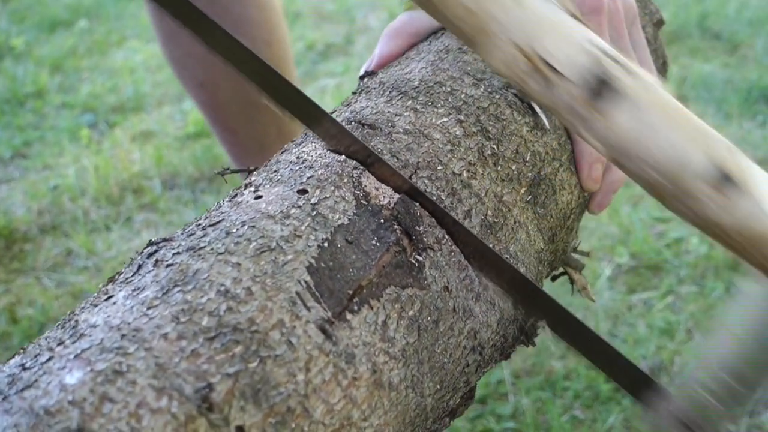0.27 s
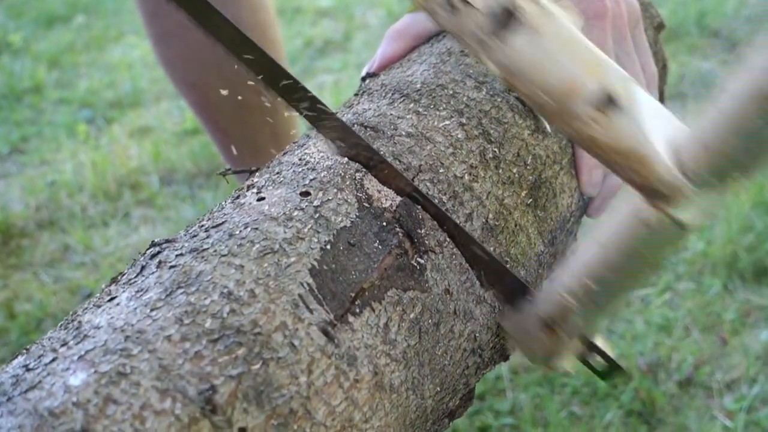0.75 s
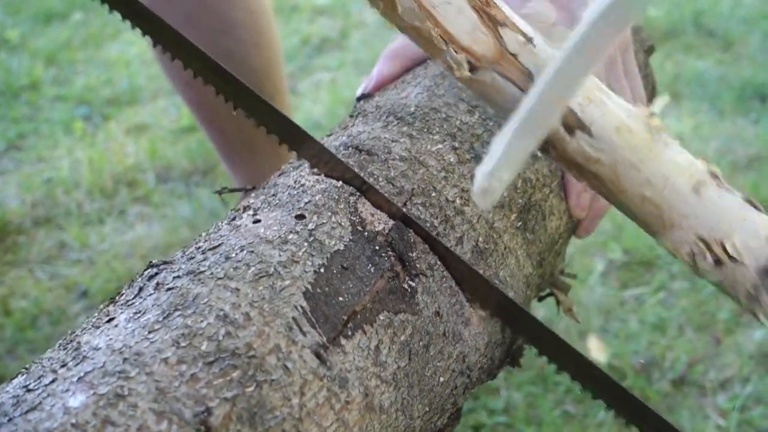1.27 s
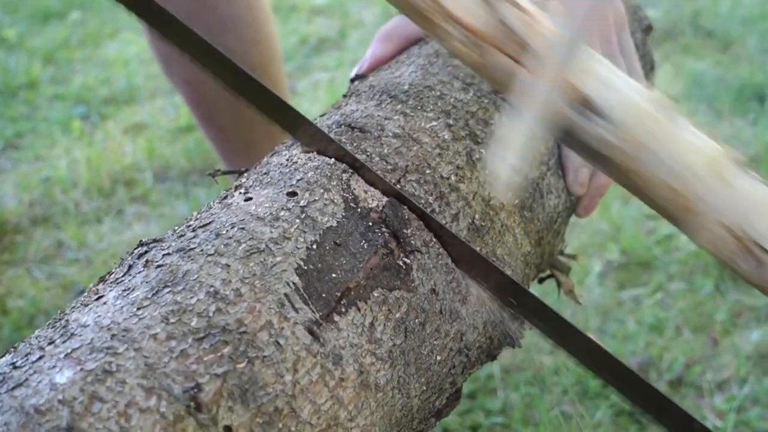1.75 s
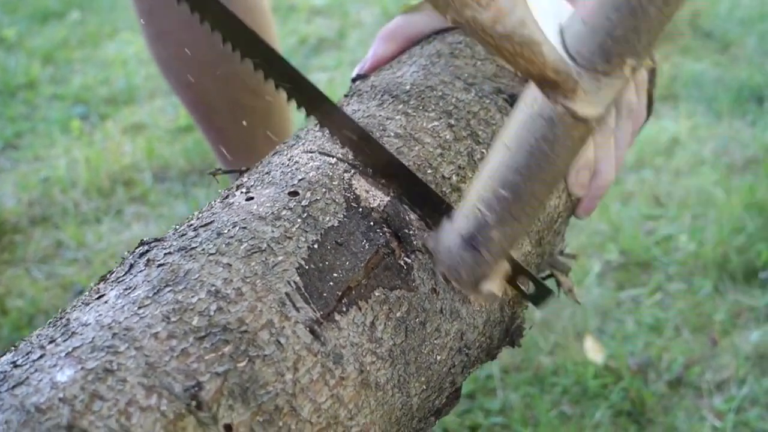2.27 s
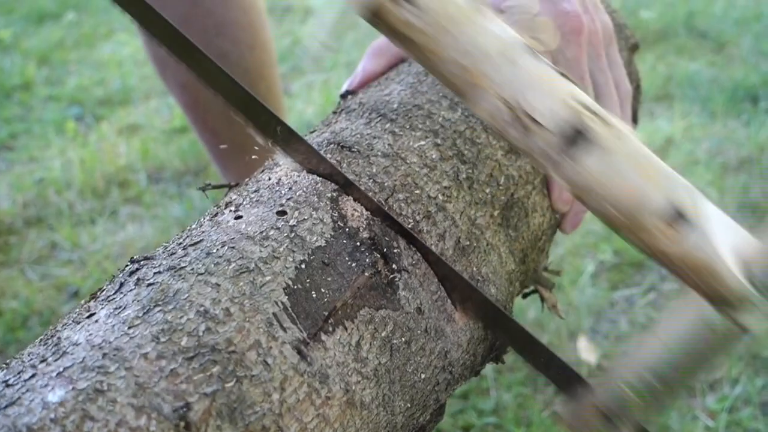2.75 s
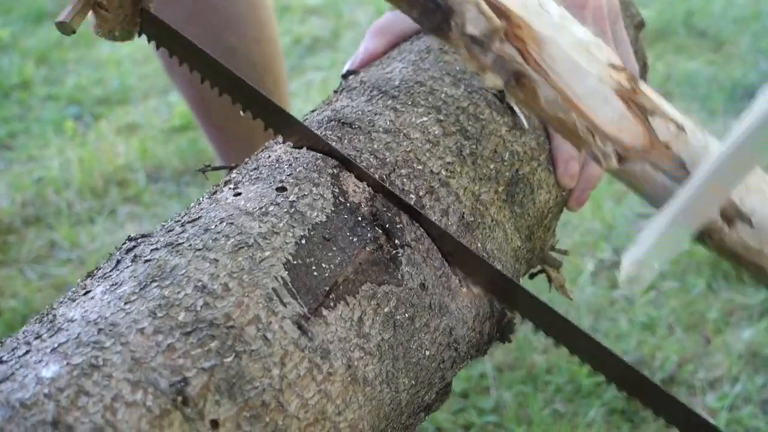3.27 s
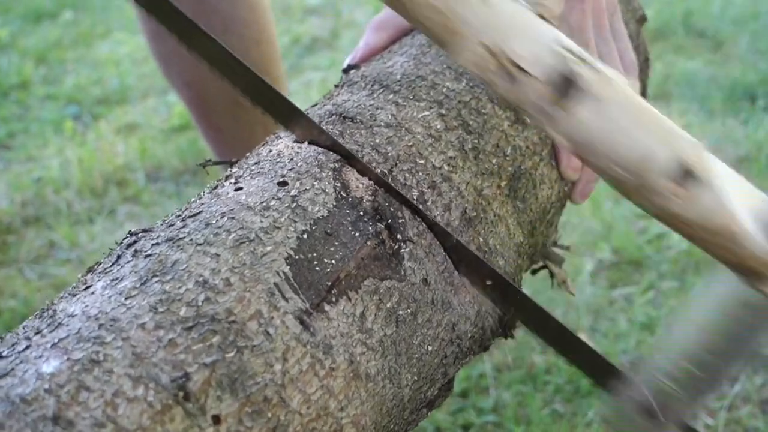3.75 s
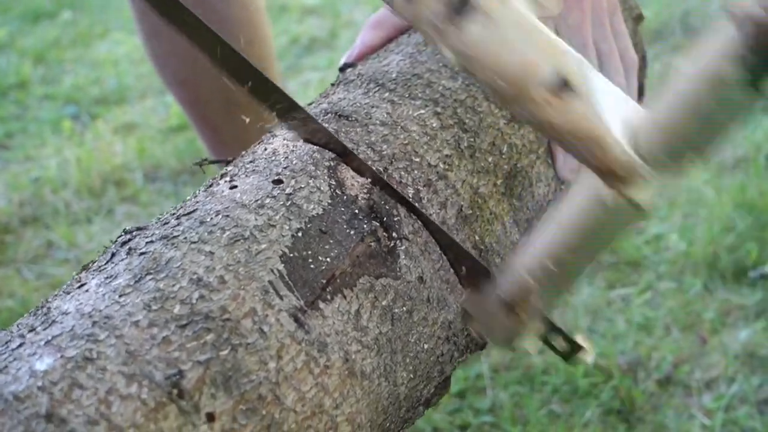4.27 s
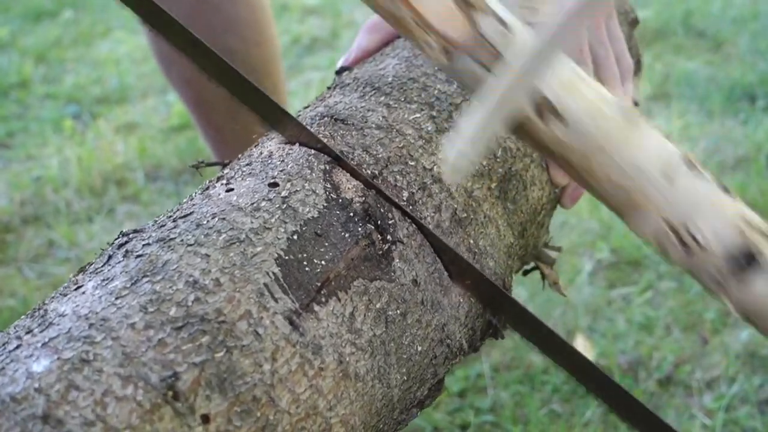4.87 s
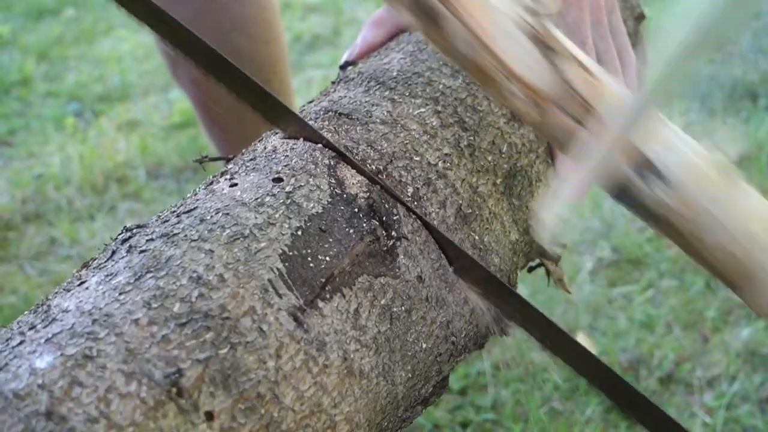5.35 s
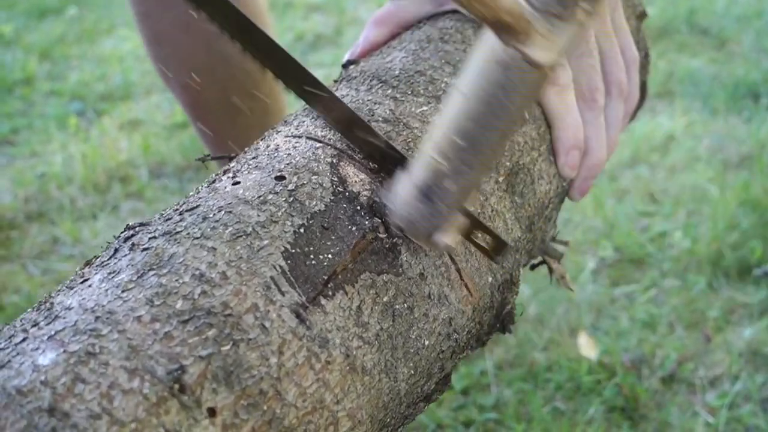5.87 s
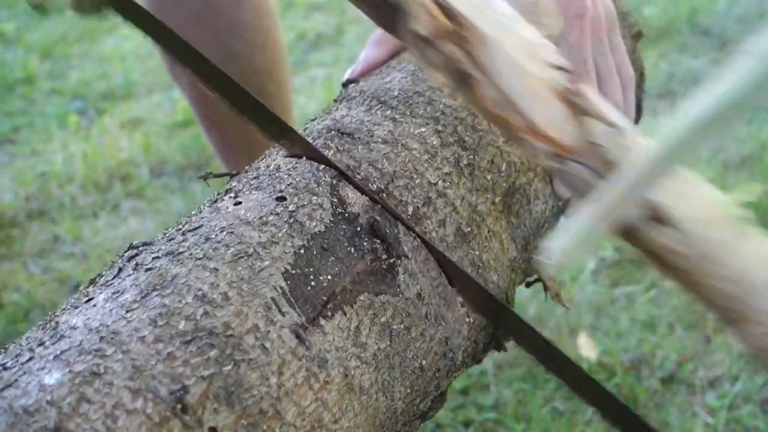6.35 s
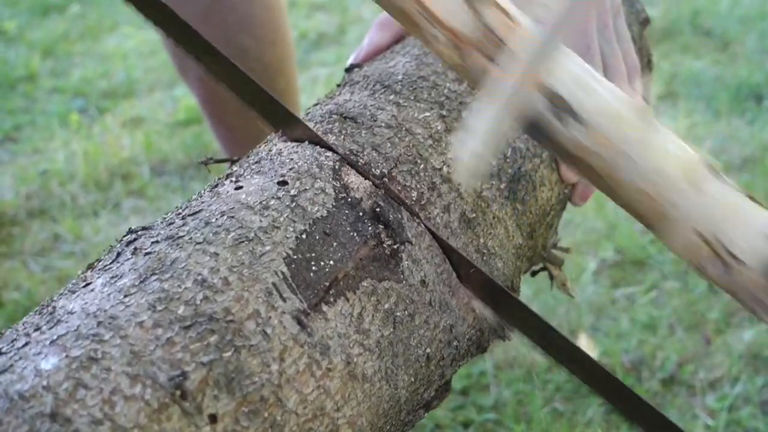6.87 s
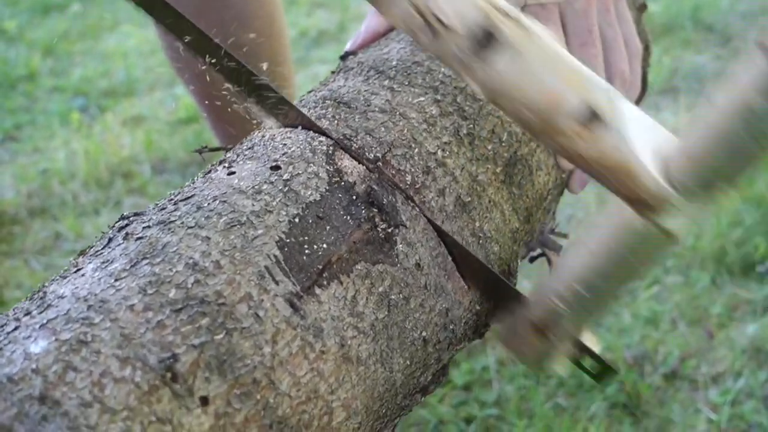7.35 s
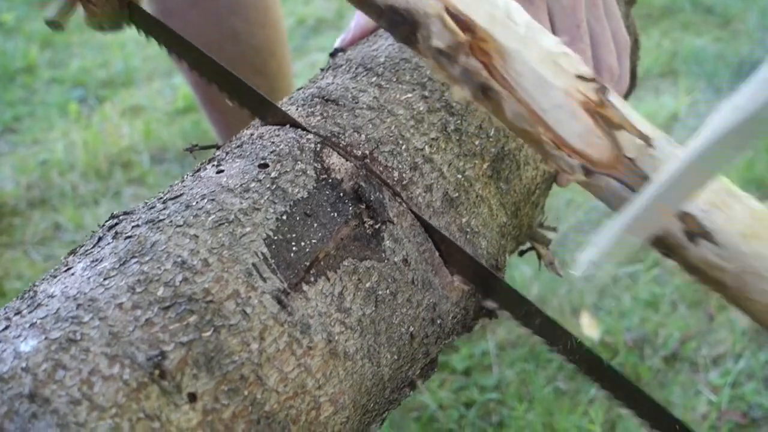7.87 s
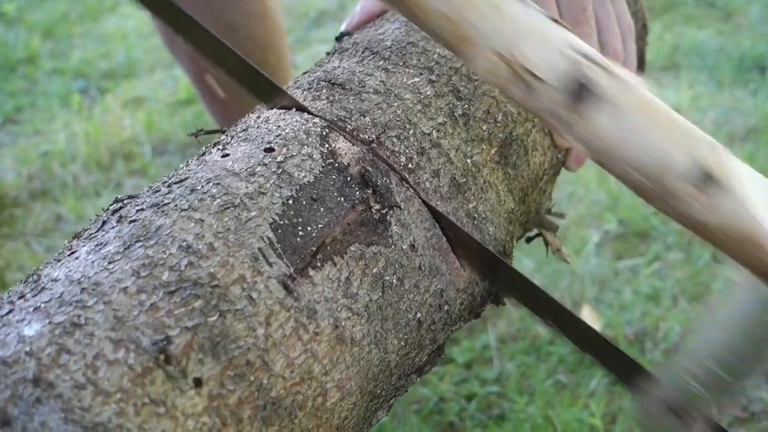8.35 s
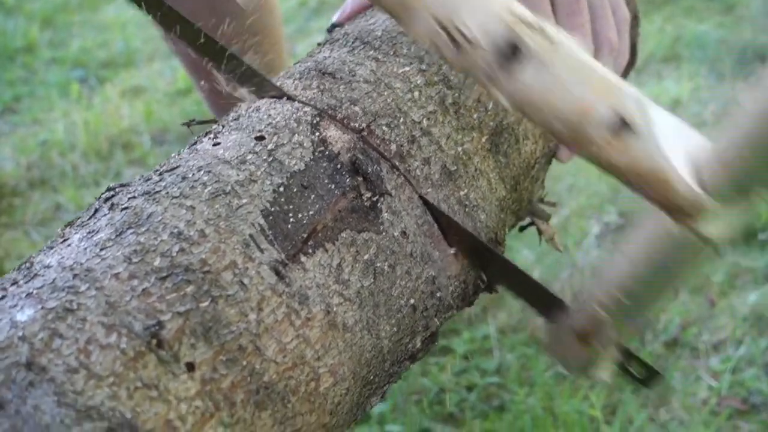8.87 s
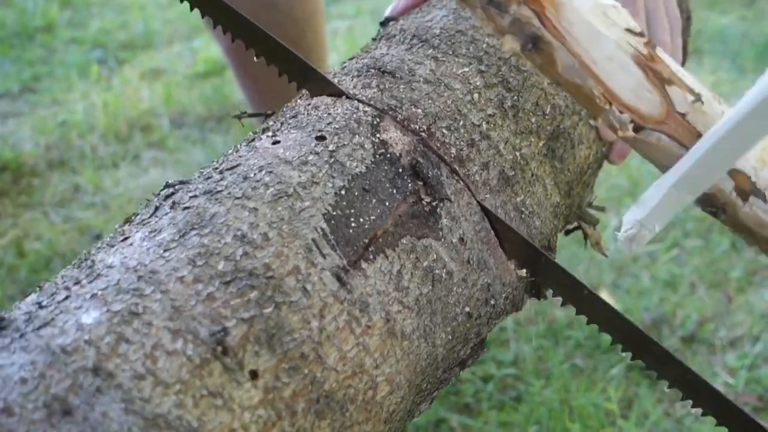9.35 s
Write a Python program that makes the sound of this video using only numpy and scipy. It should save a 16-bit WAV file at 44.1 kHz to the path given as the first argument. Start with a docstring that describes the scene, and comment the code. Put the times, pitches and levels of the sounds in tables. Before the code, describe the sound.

A hand saw rasps steadily back and forth through a log, its blade ticking, while wind gusts rumble on the microphone.

```python
"""A hand saw rasps back and forth through a thick log, close by, out on a lawn.
Its teeth tear the wood fibres in a stream of tiny snaps that ring the log, the blade and the saw's
wooden frame. The blade ticks in the cut, often as the stroke turns, and now and then it snags.
Gusts of wind rumble on the microphone, over a faint outdoor hiss."""
import sys
import numpy as np
from scipy import signal
from scipy.fft import rfft, irfft, next_fast_len
from scipy.io import wavfile
from scipy.ndimage import uniform_filter1d, map_coordinates

SR = 44100
rng = np.random.default_rng(int(sys.argv[2]) if len(sys.argv) > 2 else 0)


def write(x):
    x = np.atleast_2d(x).T
    wavfile.write(sys.argv[1], SR, np.round(np.clip(x, -1, 1) * 32767).astype(np.int16))


N = 423845

# The brief ringing tones of the blade in the cut. Each row: pitch in Hz, width in Hz, level in dB.
BLADE_TONES = [(1550, 350, -9), (2060, 260, -5), (2820, 330, -1), (3800, 450, 1), (6500, 450, -3)]


def saw():
    """The moving teeth bite unevenly; the same bite makes the rasp and shakes the frame."""
    gain, ring_db = strokes()
    speed = np.sqrt(10 * gain)  # a louder stroke stands for a faster blade
    chatter = amp(wobble(90))  # groups of teeth grip more or less
    tearing = fibres(speed, tears_per_s=1100, spread_db=2.8, fade_s=.0005)
    bite = gain * unit(chatter * (1.1 + .5 * tearing))
    return rasp(bite, speed) + frame_ring(bite, ring_db) + catching_teeth(gain)


def strokes():
    """The arm pulls and pushes in turn. Gives the rasp's gain and the frame's ring in dB over time."""
    # Each row: start and end in seconds, level halfway in dB, change from start to end in dB,
    # relative strength of the frame's ring in dB.
    arm_strokes = [(-0.12, 0.19, -26.5, 11.5, -8.5), (0.182, 0.503, -22.5, -7.5, -3),
                   (0.531, 0.884, -25.5, 19, -8.5), (0.869, 1.147, -22.5, 0, -5),
                   (1.306, 1.617, -27, 11.5, -8), (1.604, 1.929, -22.5, -11.5, -4),
                   (1.989, 2.313, -24, 14.5, -7), (2.293, 2.579, -24.5, -14, -5.5),
                   (2.629, 2.94, -27, 23.5, -6), (2.924, 3.258, -22.5, -12.5, -4),
                   (3.299, 3.673, -27.5, 8.5, -5), (3.688, 3.998, -22.5, -15.5, -4.5),
                   (4.044, 4.44, -27.5, 14.5, -8), (4.41, 4.755, -22, -9, -5.5),
                   (4.776, 5.177, -26.5, 11, -5), (5.16, 5.495, -22.5, -7, -5.5),
                   (5.543, 5.89, -22.5, 13.5, -7.5), (5.856, 6.3, -24, 2, -4.5),
                   (6.328, 6.7, -24, 14, -3.0), (6.678, 7.063, -24, -6.5, -4),
                   (7.104, 7.489, -26, 19, -3.5), (7.467, 7.814, -23.5, 1.5, -3),
                   (7.87, 8.249, -25.5, 24.5, -5.5), (8.214, 8.578, -24.5, 3, -3.5),
                   (8.629, 9.03, -27.5, 11.2, -1), (9.122, 9.414, -24.5, -19, -2.0),
                   (9.497, 9.85, -36.5, -18, 1.5)]
    # The blade snags or lurches free. Each row: time in seconds, length in seconds, level change in dB.
    snags = [(4.151, .04, -2.5), (4.98, 0.02, -8.5), (5.213, 0.015, -2.5), (5.634, 0.023, -5),
             (5.89, 0.015, -9), (5.921, 0.026, 4), (5.949, 0.018, -18), (6.357, 0.014, -15),
             (6.413, 0.017, 4), (8.246, 0.014, -18), (9.006, 0.018, -24)]
    pull_s, push_s = (0.07, 0.16), (0.16, 0.06)  # fade in, fade out: a pull bites fast, a push slowly
    ring_rise_db = 4  # the frame is loaded more as a stroke goes on
    t = np.arange(N) / SR
    gain, ring_db = np.zeros((2, N))
    ease = lambda share: np.sin(np.pi / 2 * np.clip(share, 0, 1)) ** 2
    for k, (start, end, db, swell_db, frame_db) in enumerate(arm_strokes):
        attack, release = push_s if k % 2 else pull_s
        first = max(round(start * SR), 0)
        now = t[first:round(end * SR)]
        past_middle = (now - start) / (end - start) - .5
        fades = ease((now - start) / attack) * ease((end - now) / release)
        gain[first:][:len(now)] += amp(db + swell_db * past_middle) * fades
        ring_db[first:][:len(now)] = frame_db + ring_rise_db * past_middle
    for when, length, change_db in snags:
        gain *= amp(change_db * np.exp(-((t - when) / length * 2) ** 4))
    return gain, ring_db


def fibres(speed, tears_per_s, spread_db, fade_s):
    """The jumpy loudness of tearing fibres. The rate is for a speed of 1; a slower blade tears fewer."""
    tears = (rng.random(N) < tears_per_s * speed / SR) * amp(spread_db * rng.exponential(size=N))
    fade = np.exp(-np.arange(SR // 100) / SR / fade_s)
    power = signal.fftconvolve(tears ** 2, fade)[:N]
    return np.sqrt(np.abs(power / uniform_filter1d(power + 1e-9, SR // 12)))


def rasp(bite, speed):
    """Teeth rip the wood: grainy noise, with splinters snapping in the treble and one bright scrape."""
    # The rasp's tone, with a thin zing above 12 kHz. Each row: frequency in Hz, level in dB.
    tone = [(760, -5.5), (1450, -6.5), (2250, 2), (3700, 2.5), (4700, -3), (10700, -7.5), (12250, -7),
            (12500, 2.5), (13100, -1.5), (15500, -3), (16300, -53)]
    # The side of the blade rubs once. In order: start in seconds, end in seconds, boost in dB.
    start, end, scrape_db = (2.335, 2.435, 11)
    split_hz = 5500
    splinters = unit(.8 + .2 * fibres(speed, tears_per_s=50, spread_db=5, fade_s=.0007))
    noise = shifting_noise(depth_db=1.8, hold_steps=8) * bite  # the blade's free length keeps changing
    shape = colour(tone)
    scale = np.sqrt(np.mean(shape(np.linspace(0, SR / 2, 2000)) ** 2))
    low = filtered(noise, lambda hz: shape(hz) / np.sqrt(1 + (hz / split_hz) ** 4))
    high = filtered(noise * splinters, lambda hz: shape(hz) / np.sqrt(1 + (split_hz / (hz + 1)) ** 4))
    rubbing = amp(scrape_db) * (np.abs(np.arange(N) / SR - (start + end) / 2) < (end - start) / 2)
    scrape = filtered(high * rubbing, lambda hz: np.exp(-((hz - 6800) / 3300) ** 2))
    return (low + high + scrape) / scale


def frame_ring(bite, ring_db):
    """The tearing and a few knocks shake the wooden frame, which rings on a little."""
    # The frame's ringing tones. Each row: pitch in Hz, width in Hz, level in dB.
    frame_tones = [(208, 8, -7), (275, 13, -3), (357, 16, 1), (417, 10, 1.5), (487, 20, -1), (669, 30, -5),
                   (746, 16, -1), (842, 26, 2), (932, 20, -2.5), (1051, 24, -4), (1148, 26, 1),
                   (1235, 60, -4.5)]
    # Each row: time in seconds, relative strength in dB, length of the blow in milliseconds.
    knocks = [(1.166, -25.5, 0.36), (1.356, -14, 1.4), (6.32, -16.5, 0.29), (6.724, -14.5, 2.2),
              (7.837, -14.5, 0.34), (8.245, -16.5, 2.35), (8.605, -14, 0.3)]
    shake = shifting_noise(depth_db=3, hold_steps=24)  # grip and position favour different tones
    shake = shake * bite * amp(ring_db + 18.5)
    for when, db, contact_ms in knocks:
        blow = np.hanning(round(contact_ms * SR / 1000))  # a shorter blow reaches higher tones
        shake[0, round(when * SR):][:len(blow)] += amp(db + 16.5) * blow
    return filtered(shake, resonances(frame_tones))


def catching_teeth(gain):
    """Single teeth catch at random during a stroke and ring the blade."""
    catches_per_s, below_rasp_db = 160, 9
    hits = (rng.random(N) < catches_per_s / SR) * amp(rng.normal(0, 2.5, N))
    jolts = signal.fftconvolve(hits, np.hanning(SR // 2000))[:N] * rng.standard_normal((2, N))
    return amp(-below_rasp_db) * gain * unit(filtered(jolts, resonances(BLADE_TONES)))


def ticks():
    """The blade ticks and fibres snap: each crack rings the blade and adds a sharp burst of treble."""
    # Each row: time in seconds, level of the ring in dB, treble compared with the ring in dB.
    cracks = [(0.9333, -8, -14), (2.0093, -31, 7), (2.3201, -23, 3), (2.3437, -9.5, -4), (2.4706, -9, -15),
              (2.6283, -24, -18), (2.6623, -13.5, -17), (3.3786, -14, -11), (3.491, -14.5, 2.5),
              (3.544, -13, -3), (3.6686, -11.5, -17), (4.0696, -36, 13), (4.1034, -35, 2), (4.122, -22, 3),
              (4.4417, -17, -1), (4.636, -23, 2), (4.959, -18, 5), (4.9824, -19.5, 8.5), (5.186, -8, -14),
              (5.237, -19, 7), (5.6134, -23, -15), (5.961, -11.5, -3), (6.0205, -7, -15), (6.042, -14, -5),
              (6.331, -13, -14), (6.3696, -20.5, 2), (6.655, -12, -18), (6.744, -8.5, -18),
              (7.1796, -12, -3), (7.525, -11.5, -5), (7.554, -8.5, -6), (7.84, -18, -17),
              (7.9468, -10.5, -18), (8.305, -10, -8), (8.6082, -17.5, -13), (8.703, -13, -14),
              (9.0195, -10.5, -16), (9.419, -24.5, -21), (9.5196, -24, 3.5)]
    out, t = np.zeros((2, N + SR)), np.arange(SR // 80) / SR
    treble = signal.butter(2, [6760, 13300], "band", fs=SR, output="sos")
    snap_shape = (1 - np.exp(-t / .0006)) * amp(-60 * t / 0.027)
    by_peak = lambda x: x / np.abs(x[0]).max()
    for when, db, treble_db in cracks:
        ring = np.zeros((2, len(t)))
        for hz, width, level in BLADE_TONES:
            fade = amp(level + rng.normal(0, 4)) * np.exp(-np.pi * width * t)
            pitch = hz * rng.normal(1, .04)  # the blade's free length shifts
            ring += fade * np.sin(2 * np.pi * pitch * t + rng.uniform(0, 2 * np.pi, (2, 1)))
        ring *= 1 - np.exp(-t / .0007)
        snap = signal.sosfilt(treble, rng.standard_normal((2, len(t))) * snap_shape)
        out[:, round(when * SR):][:, :len(t)] += amp(db) * (by_peak(ring) + amp(treble_db) * by_peak(snap))
    return out[:, :N]


def wind():
    """Small swirls of air hit one microphone opening or both, on top of a lumpy rumble."""
    # How hard the wind blows. Each row: time in seconds, level in dB.
    gusts = [(0.0, -49), (0.43, -49), (0.51, -27.5), (0.67, -36), (1.5, -32), (1.58, -49.5), (1.76, -40),
             (2.33, -40), (2.4, -57), (2.47, -54), (2.52, -41.5), (2.84, -44), (2.86, -32), (3.21, -26),
             (3.26, -38.5), (3.59, -43), (3.67, -26.5), (3.88, -46), (3.98, -23), (4.155, -20.5),
             (4.19, -35), (4.26, -40), (4.3, -25.5), (4.38, -22), (4.46, -25.5), (4.63, -58), (4.74, -29.5),
             (5.09, -42.5), (5.49, -28.5), (5.67, -52), (6.23, -39.5), (6.69, -52.5), (6.72, -39.5),
             (7.49, -29), (7.65, -38), (7.84, -26), (8.24, -34.5), (8.32, -20.5), (8.43, -41.5),
             (8.62, -25.5), (9.56, -25), (9.61, -20)]
    # The rumble's tone. Each row: frequency in Hz, level in dB.
    rumble_tone = [(12, -41), (20, -7), (54, 0), (97, 0.5), (182, -5), (443, -14.5), (500, -16), (650, -20),
                   (1100, -120)]
    gust_db = np.interp(np.arange(N) / SR, *np.transpose(gusts))
    swirl_hz = 130 * amp(0.23 * (gust_db + 31.5))  # faster wind makes quicker swirls
    lumps = amp(4 * wobble(12) + 2 * wobble(35))
    shared, apart = filtered(rng.standard_normal((2, N)), colour(rumble_tone))
    rumble = unit(lumps * (shared + np.outer([.35, -.35], apart)))  # mostly alike left and right
    swirls = np.zeros((2, N + SR))
    for when, pitch, size, pan in rng.standard_normal((600, 4)):
        at = int(abs(when) * 1e7) % N  # a random spot anywhere in the scene
        hz = max(swirl_hz[at] * np.exp(.4 * pitch), 30)
        cycles = np.arange(int(3.2 * SR / hz)) * hz / SR
        wave = amp(2.5 * size) * np.sin(2 * np.pi * cycles) * np.hanning(len(cycles))
        sides = 1 + np.array([1, -1]) * .4 * pan * hz / 150  # small, quick swirls favour one side
        swirls[:, at:at + len(wave)] += np.outer(sides, wave)
    return amp(gust_db) * (0.6 * rumble + unit(swirls[:, :N]))


def hiss():
    """Faint, steady outdoor air."""
    # The air's tone. Each row: frequency in Hz, level in dB.
    tone = [(300, -23.5), (600, -11.5), (1500, -16.5), (4000, -20.5), (16000, -28.5)]
    return amp(-50) * unit(filtered(rng.standard_normal((2, N)), colour(tone)))


def microphone(pair):
    """Two unrelated signals become left and right, alike in the bass and apart in the treble."""
    # Each row: frequency in Hz, how alike the two sides sound
    # (anything above 0.96 counts as 0.96, nearly the same).
    likeness = [(300, 5.5), (1400, 3.44), (3100, 0.66), (5000, 0.04), (9000, .5), (15000, 0.33)]
    # Each row: frequency in Hz, how much louder the left is than the right in dB.
    balance = [(300, -0.5), (700, 3), (1650, 3), (4600, -6.5), (8000, 0), (13000, -2.5)]
    angle = lambda hz: np.arccos(np.clip(along(likeness, hz), -1, .96)) / 2
    mid, side = filtered(pair, lambda hz: np.array([np.cos(angle(hz)), np.sin(angle(hz))]))
    left_right = np.array([mid + side, mid - side])
    return filtered(left_right, lambda hz: amp(np.outer([.5, -.5], along(balance, hz))))


def shifting_noise(depth_db, hold_steps):
    """Two noises whose narrow bands swell and fade together; more hold steps make the drift slower."""
    bands = signal.stft(rng.standard_normal((2, N + 512), np.float32), nperseg=512)[2]
    swells = uniform_filter1d(rng.standard_normal(bands.shape[1:]), size=4, axis=0)
    swells = uniform_filter1d(swells, size=hold_steps, axis=1)
    return unit(signal.istft(bands * amp(depth_db * unit(swells)), nperseg=512)[1][:, :N])


def amp(db):
    """Turns decibels into a gain to multiply by."""
    return 10 ** (np.asarray(db) / 20)


def unit(x):
    """Scales a signal to an average (rms) level of 1."""
    return x / np.sqrt(np.mean(x ** 2) + 1e-20)


def along(points, hz):
    """Reads between rows of frequency and value, giving every octave equal room."""
    freqs, values = np.transpose(points)
    return np.interp(np.log(hz + 1), np.log(freqs + 1), values)


def wobble(rate):
    """A smooth curve through this many random points a second."""
    return map_coordinates(rng.standard_normal(int(N * rate / SR) + 4), [np.arange(N) * rate / SR])


def filtered(x, response):
    """Multiplies each frequency in x by response(hz)."""
    size = next_fast_len(N + SR // 2)
    return irfft(rfft(x, size) * response(np.fft.rfftfreq(size, 1 / SR)), size)[..., :N]


def colour(points):
    """A filter shape drawn through rows of frequency in Hz and level in dB."""
    return lambda hz: amp(along(points, hz))


def resonances(tones):
    """A filter that rings at the given tones; narrower ones ring longer."""
    return lambda hz: sum((-1) ** k * amp(db) * 1j * hz * width / (pitch ** 2 - hz ** 2 + 1j * hz * width)
                          for k, (pitch, width, db) in enumerate(tones))


def scene():
    """The saw and the hiss reach the microphone through the air; the wind blows right on it."""
    return microphone(saw() + ticks() + hiss()) + wind()


def record(dry):
    """The camera rounds off the tallest peaks and cuts the very highest treble."""
    ceiling, top_hz = .62, 16350
    rounded = dry / (1 + np.abs(dry / ceiling) ** 3) ** (1 / 3)
    return filtered(rounded, lambda hz: hz < top_hz)


dry = scene()
out = record(dry)
write(out)
```